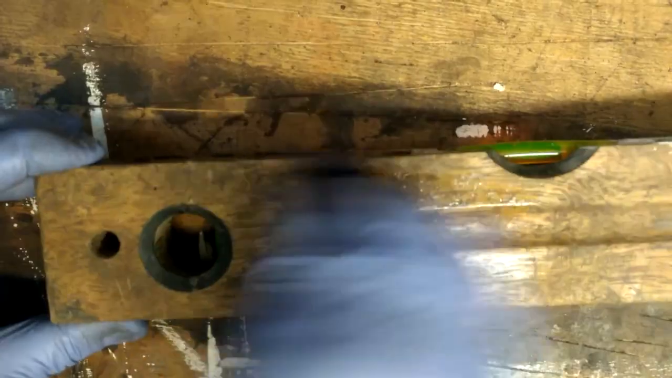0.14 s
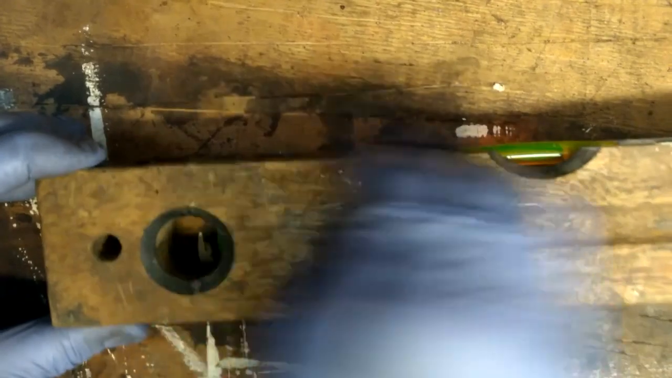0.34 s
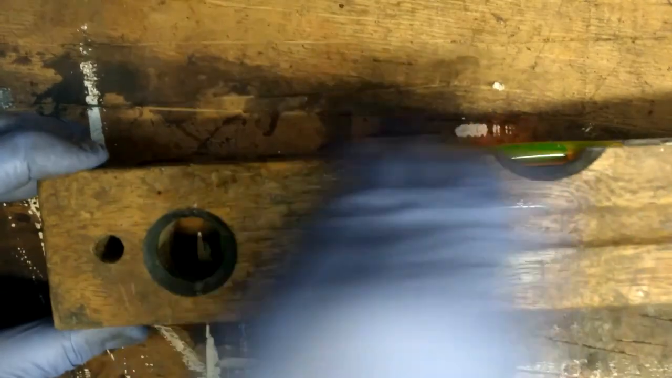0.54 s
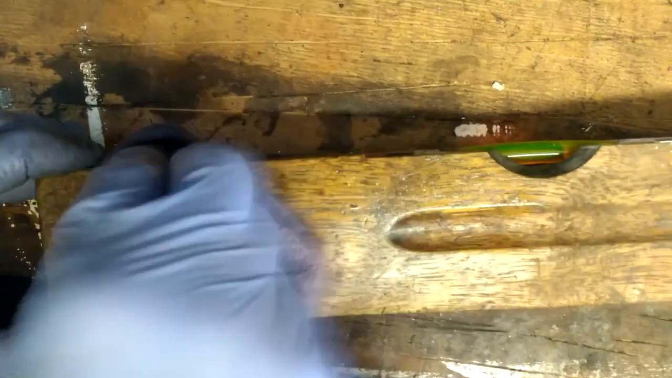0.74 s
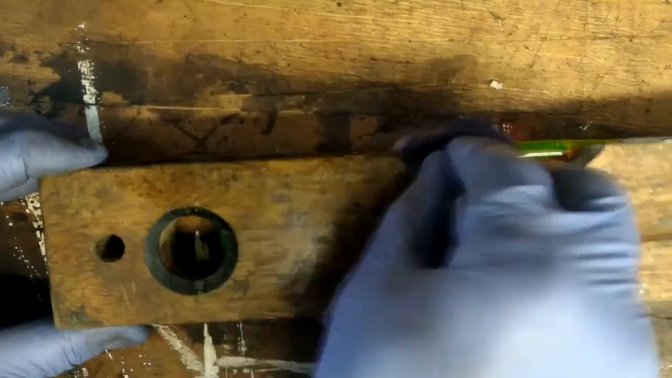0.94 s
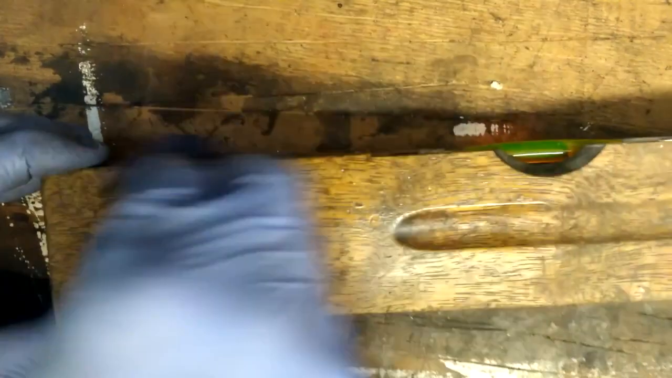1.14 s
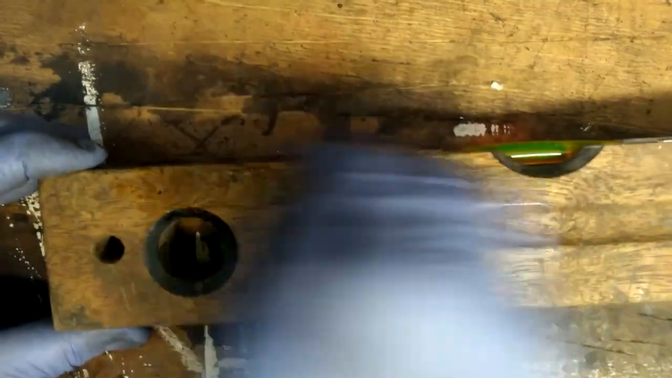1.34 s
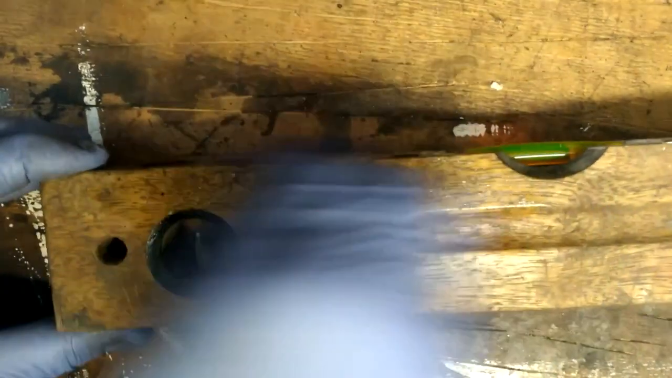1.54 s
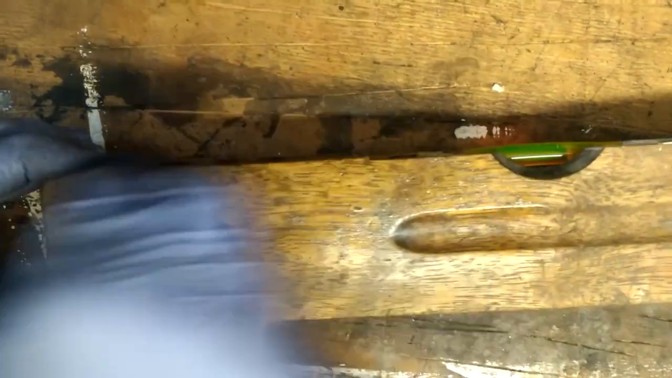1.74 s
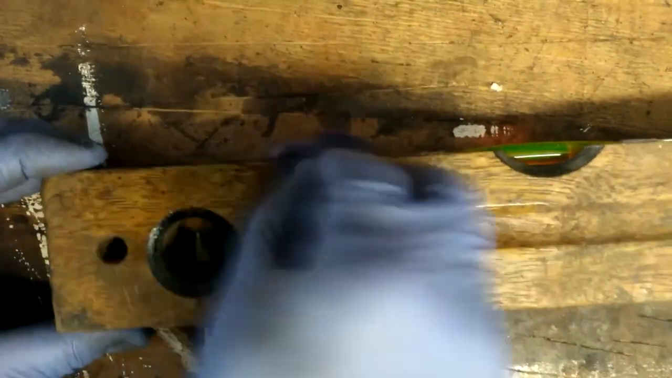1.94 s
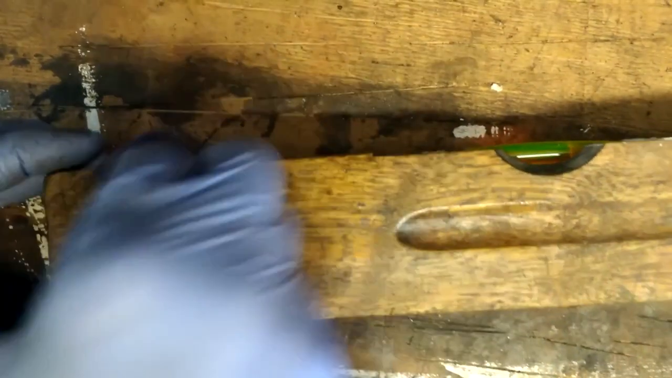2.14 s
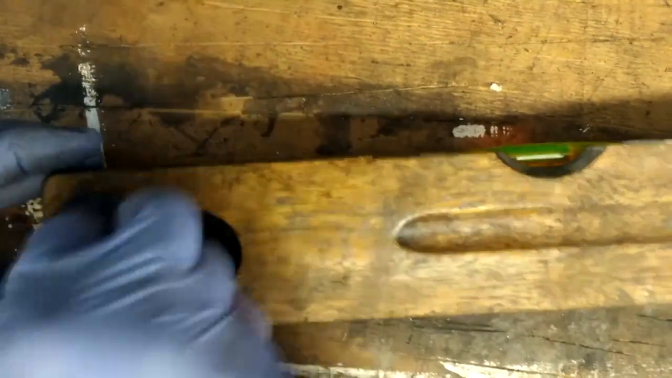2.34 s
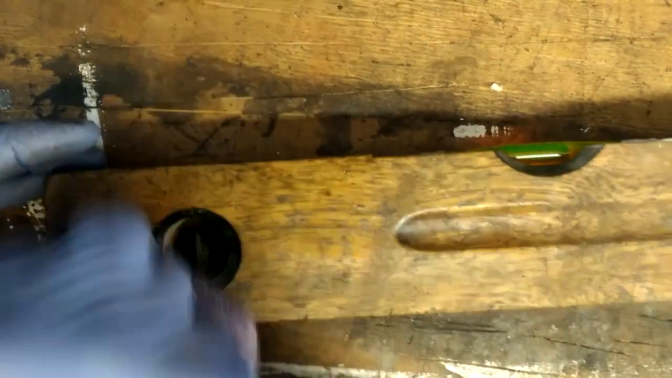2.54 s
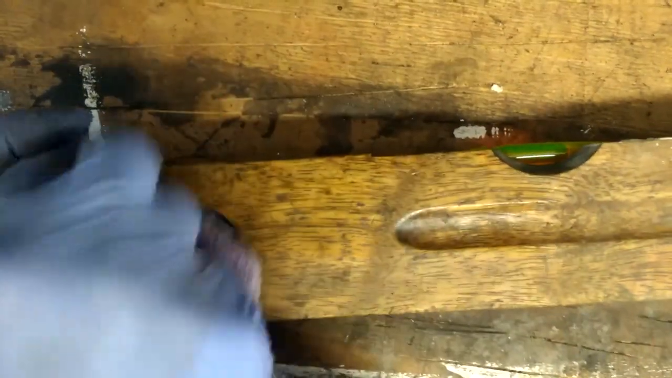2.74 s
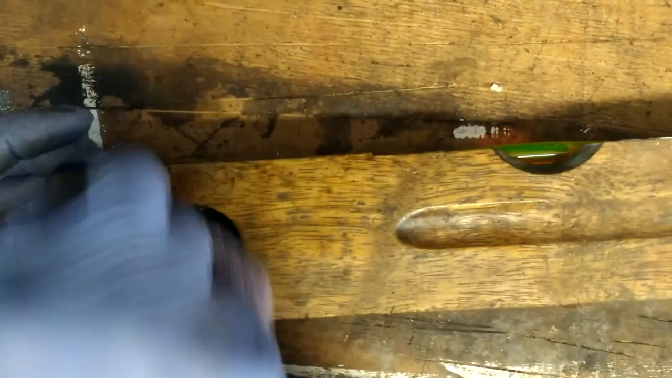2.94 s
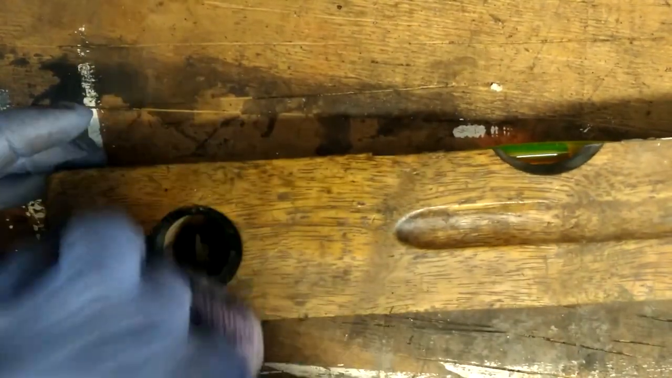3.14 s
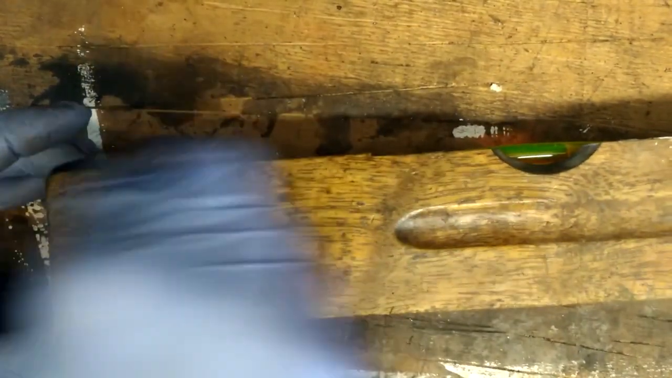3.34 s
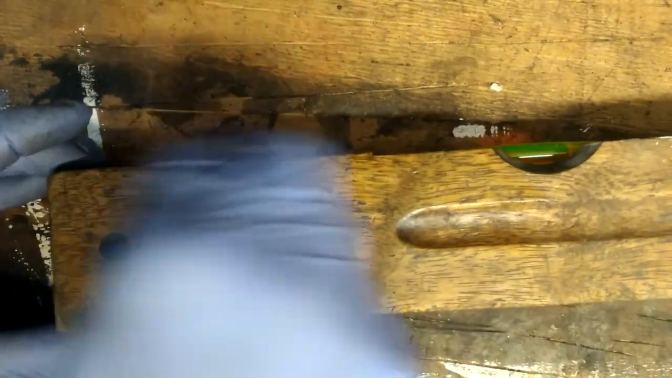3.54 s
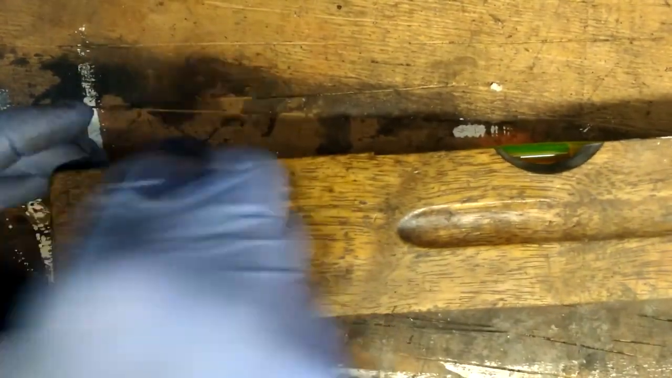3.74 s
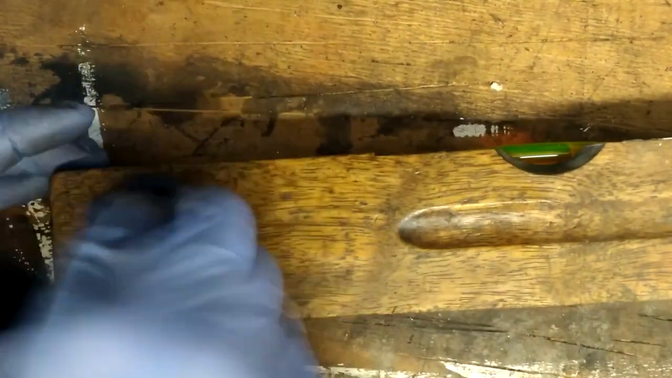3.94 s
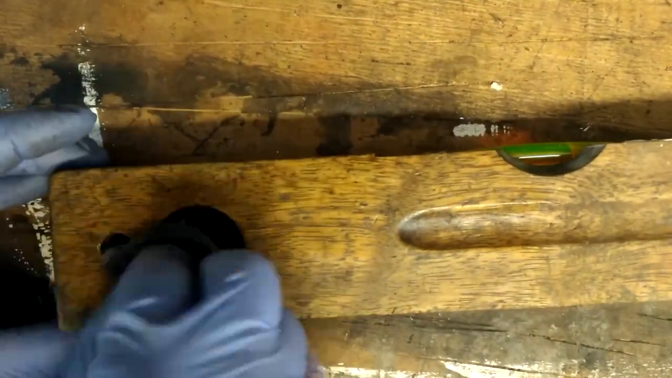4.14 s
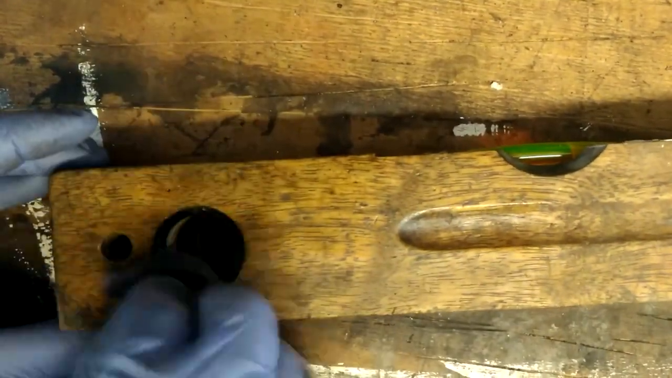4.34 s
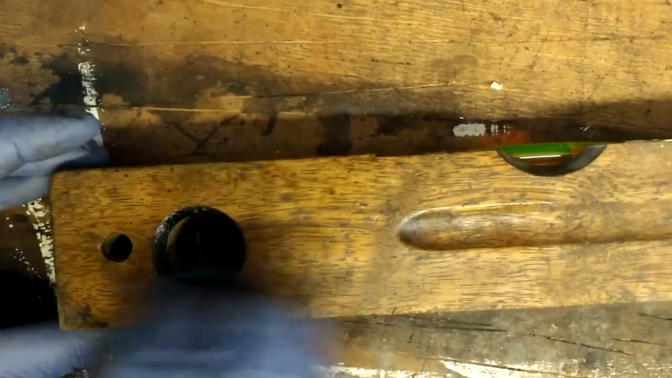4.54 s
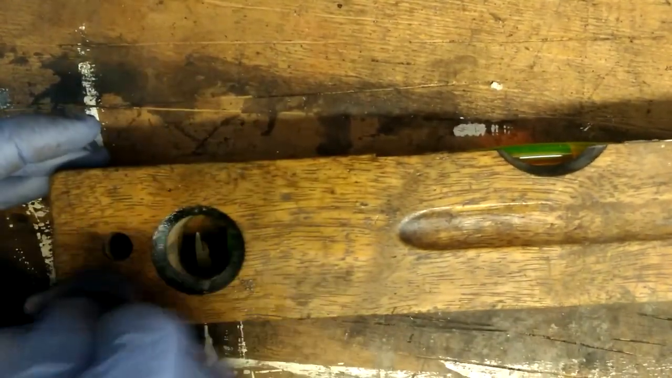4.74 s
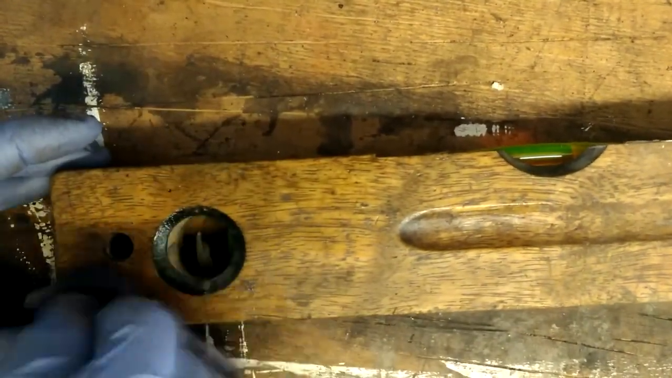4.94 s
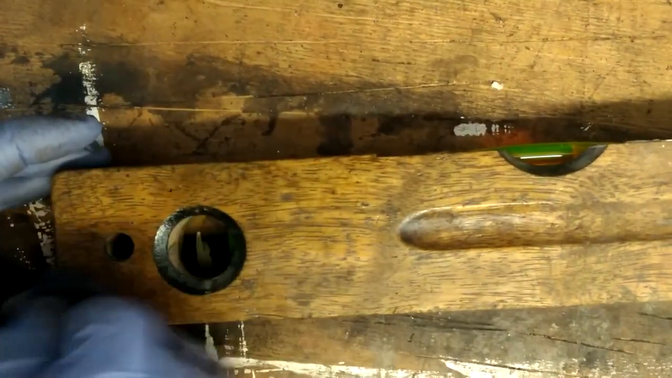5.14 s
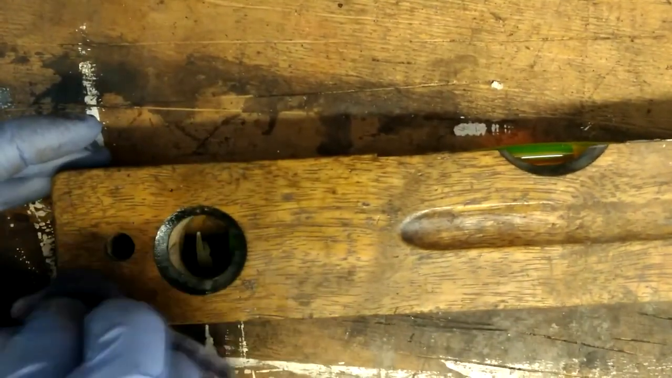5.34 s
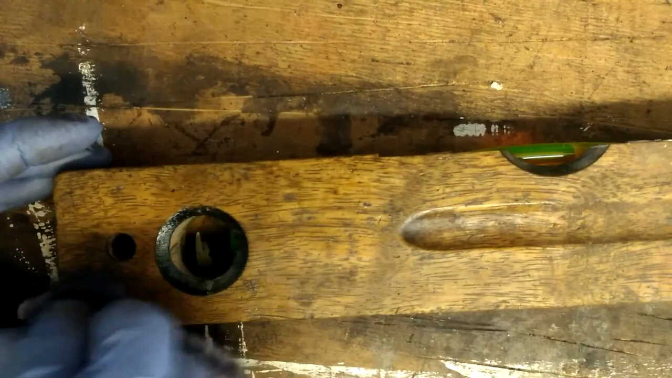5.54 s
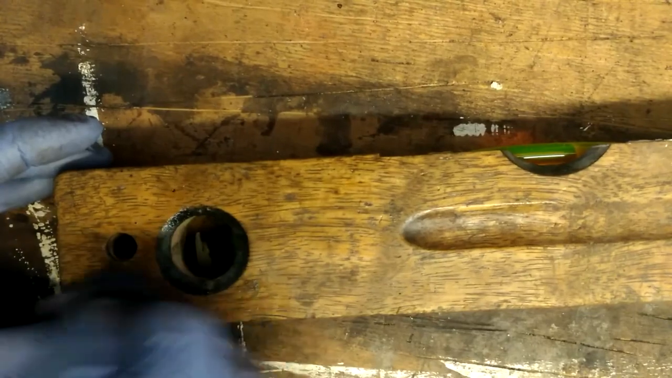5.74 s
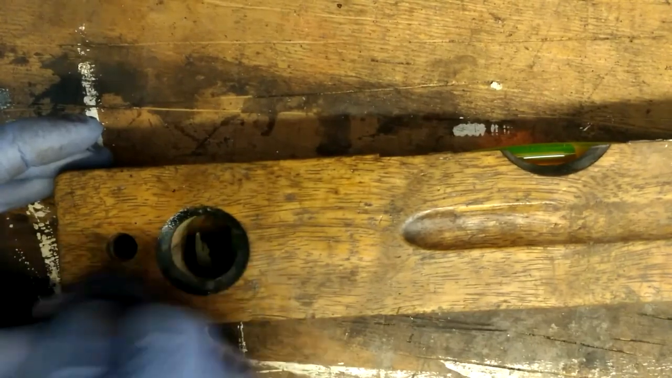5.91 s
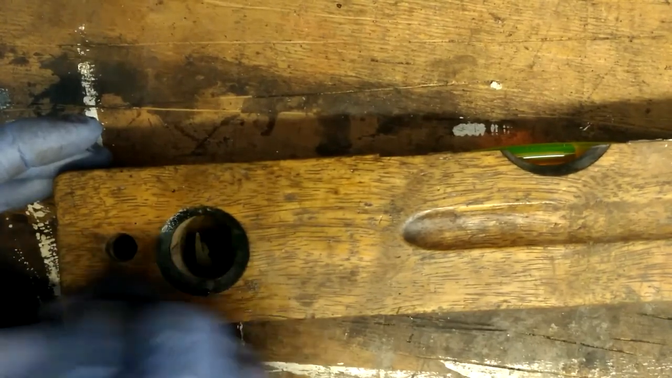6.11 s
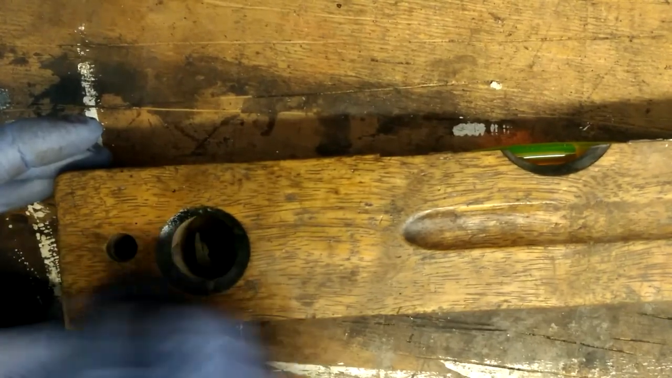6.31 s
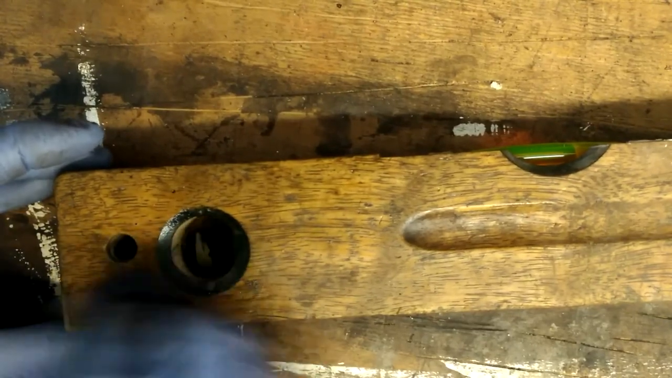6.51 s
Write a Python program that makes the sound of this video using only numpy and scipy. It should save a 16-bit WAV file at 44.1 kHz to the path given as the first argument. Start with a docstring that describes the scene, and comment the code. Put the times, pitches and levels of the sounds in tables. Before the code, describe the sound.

Fast, continuous wet-cloth rubbing over hollow-sounding wood, strokes quickening into short scrubs, light knocks and a small wet snap near the end

```python
"""Scrubbing an old spirit level

A gloved hand rubs a wooden level with a wet rag, in a small, quiet workshop, close to a microphone pair.
Every stroke is filtered noise shaped by the hand's speed: cloth hiss, and friction that rings the wood
and its metal ring. The level knocks softly on the bench at the turns, as bursts of decaying modes.
Short grips of the rag scrape and chafe, wet cloth snaps near the end; the microphones add a low noise.
"""
import sys
import numpy as np
from scipy import signal
from scipy.fft import rfft, irfft
from scipy.io import wavfile
from scipy.ndimage import uniform_filter1d

SR = 44100
rng = np.random.default_rng(int(sys.argv[2]) if len(sys.argv) > 2 else 0)


def wav_out(sig):
    """Save sig, one row per channel (or a flat mono array), as 16-bit PCM at SR to the path in sys.argv[1]."""
    wavfile.write(sys.argv[1], SR, np.round(np.clip(np.atleast_2d(sig).T, -1, 1) * 32767).astype(np.int16))


N = 294147
TIME, HZ = np.arange(N) / SR, np.fft.rfftfreq(N, 1 / SR)


def amp(db):
    """Decibels to gain."""
    return 10 ** (np.asarray(db) / 20)


def unit(x):
    """Scales to rms 1."""
    return x / np.sqrt(np.mean(abs(x) ** 2) + 1e-20)


def read(points, hz):
    """Reads a spectrum table on a log-frequency axis."""
    f, value = np.transpose(points)
    return np.interp(np.log(hz + 1), np.log(f + 1), value)


def add(mix, s, sound):
    """Mixes a sound in at time s."""
    part = mix[max(round(s * SR), 0):][:len(sound)]
    part += sound[:len(part)]


def wobble(rate_hz):
    """Slow random drift of rms 1, its spectrum fading out around the rate."""
    return unit(irfft(rfft(rng.standard_normal(N)) * np.exp(-(HZ / rate_hz) ** 2), N))


# spectrum of the microphones' own noise: (frequency [Hz], relative density [dB per Hz])
MIC_NOISE_SPECTRUM = [(20, 13), (52, 16.5), (78, 4.5), (200, -17), (400, -4.5), (1000, -15.5), (2000, -6),
                      (5000, -31), (15000, -37)]


def mic_noise():
    """Steady noise of the microphones themselves, mostly a deep rumble."""
    noise = rng.standard_normal((2, N))
    return amp(-55) * unit(irfft(rfft(noise) * amp(read(MIC_NOISE_SPECTRUM, HZ)), N))


def friction(response, catches_per_s, catch_share, flutter_db, flutter_hz):
    """Countless sliding fibres and a few that catch and let go, under unsteady pressure.

    Gives a direct and a scattered part; catch_share is the share of power in the catches.
    """
    slide = rng.standard_normal((2, N))
    catches = rng.standard_normal((2, N)) * (rng.random(N) < catches_per_s / SR)
    force = np.sqrt(1 - catch_share) * slide + np.sqrt(catch_share) * unit(catches)
    force *= amp(flutter_db * wobble(flutter_hz))
    return unit(irfft(rfft(force) * response, N))


# the strokes: (start [s], length [s], swell from start to end [dB],
# fizz [dB], swish [dB], wood [dB], high modes [dB]); each layer scales the swell and trims its level
STROKES = [(0.044, 0.11, -2, -42, -47.5, -48, -65), (0.149, 0.11, -4, -40.5, -48, -53, -63),
           (0.263, 0.11, 5, -41, -49.5, -61, -57), (0.377, 0.13, 11, -41, -47.5, -49, -67),
           (0.521, 0.16, 9, -44, -49.5, -50, -71), (0.686, 0.15, 9, -41.5, -48.5, -48, -57.5),
           (0.837, 0.17, 8, -45, -49.5, -46, -61), (1.018, 0.15, 10, -41.5, -48.5, -46, -68),
           (1.196, 0.16, 4, -43, -49.5, -49, -62), (1.358, 0.16, 11, -43.5, -50.5, -45.5, -62),
           (1.531, 0.15, 6, -44, -52, -45, -57.5), (1.69, 0.16, 20, -44, -52, -51, -68),
           (1.86, 0.14, 9, -45, -50.5, -44.5, -60), (2.003, 0.14, 15, -44, -51, -48, -58),
           (2.151, 0.092, 4, -43.5, -53.5, -57, -54.5), (2.264, 0.12, 0, -43.5, -52.5, -45.5, -60),
           (2.352, 0.1, 16, -51.5, -71, -54, -62), (2.435, 0.087, 2, -41.5, -53.5, -43.5, -55),
           (2.544, 0.12, -6, -44, -51.5, -45.5, -57.5), (2.66, 0.12, 12, -45, -53, -46, -54),
           (2.802, 0.12, 12, -44, -53.5, -47, -55.5), (2.949, 0.11, 1, -42.5, -51.5, -40, -55),
           (3.073, 0.1, 9, -42, -51.5, -44, -56.5), (3.204, 0.11, -4, -47, -54.5, -42, -55.5),
           (3.282, 0.11, 9, -42.5, -52, -43.5, -62), (3.404, 0.11, 1, -44.5, -57, -43, -56.5),
           (3.515, 0.1, 18, -43.5, -55.5, -48, -60), (3.623, 0.11, 18, -43.5, -52, -40.5, -57),
           (3.75, 0.09, 4, -44, -52, -43.5, -58), (3.851, 0.098, 7, -43.5, -57, -47, -58),
           (3.947, 0.086, 19, -43.5, -56, -47.5, -60), (4.023, 0.11, 4, -45.5, -55, -48, -61),
           (4.131, 0.089, 6, -45, -52.5, -54, -60), (4.229, 0.096, 13, -46, -53, -70, -58.5),
           (4.332, 0.092, 4, -45.5, -54, -66, -62.0), (4.439, 0.087, 22, -47.5, -57, -68, -62),
           (4.545, 0.12, 13, -45.5, -57, -56, -60.0), (4.663, 0.14, 30, -47.5, -55, -54, -67),
           (4.807, 0.11, 6, -47, -53.5, -46.5, -59), (4.922, 0.11, 13, -46.5, -53, -46, -59.5),
           (5.042, 0.091, 1, -45.5, -54.5, -51, -61), (5.14, 0.091, 13, -46, -51, -49.5, -53),
           (5.256, 0.084, 1, -46, -49, -44.5, -59), (5.348, 0.075, 10, -49.5, -56.5, -52, -54.5),
           (5.442, 0.078, 4, -44.5, -54, -61, -58.5), (5.529, 0.08, 3, -48, -55, -52, -60),
           (5.617, 0.08, 3, -46, -53.5, -52, -58), (5.702, 0.067, 18, -44, -53.5, -48, -60.0),
           (5.788, 0.076, 12, -45.5, -57, -50, -57.5), (5.876, 0.078, 12, -44.5, -54, -57, -61),
           (5.964, 0.083, 7, -46.5, -54.5, -51, -59.5), (6.052, 0.082, 25, -46.5, -57.5, -51, -57),
           (6.154, 0.08, 12, -48.5, -57, -49.5, -60), (6.247, 0.083, 1, -46.5, -51.5, -69, -55.5),
           (6.342, 0.11, -21, -48, -54, -45, -61), (6.435, 0.1, -20, -53, -57, -62, -76),
           (6.531, 0.19, 26, -50, -58.5, -57, -66)]
START, LENGTH, SWELL_DB, FIZZ_DB, SWISH_DB, WOOD_DB, RING_DB = np.transpose(STROKES)
ATTACK_S, RELEASE_S = 0.031, 0.059  # the hand gets up to speed quickly and brakes more slowly


def stroke_gain(levels_db, speed_power, swell_share):
    """Each stroke speeds up, holds and brakes as the hand bears down or eases; gain is a power of speed."""
    gain = np.zeros(N)
    for start, length, swell_db, db in zip(START, LENGTH, SWELL_DB, levels_db):
        t = np.arange(0, length, 1 / SR)
        ramps = np.clip([t / ATTACK_S, (length - t) / RELEASE_S], 0, 1)
        rise, fall = np.sin(np.pi / 2 * ramps)
        level_db = db + swell_share * swell_db * (t / length - .5)
        add(gain, start, amp(level_db) * (rise * fall) ** speed_power)
    return gain


# the held rag keeps rustling while the hand turns: (time [s], level before each layer's trim [dB])
RUSTLE = [(0, -65), (0.04, -64), (0.1, -56), (1.9, -52.5), (2.6, -55), (4.4, -56.5), (6.4, -56.5),
          (6.53, -73), (6.67, -58.5)]


def scrubbing():
    """Cloth hiss follows the speed closely; wood and bench stay loaded through the turns."""
    rustle = amp(np.interp(TIME, *np.transpose(RUSTLE)))
    wood_drive = stroke_gain(WOOD_DB, speed_power=0.91, swell_share=0.14)
    wood = rubbed_wood() * np.hypot(amp(-4.0) * wood_drive, amp(3.0) * rustle)
    return cloth(rustle) + rasp() + wood + bench_rumble(rustle, corner_hz=120)


def stroke_hiss(response, drive, rest):
    """Fibres sliding over the wood, loud in mid-stroke and sinking to a rustle at the turns."""
    hiss = friction(response, catches_per_s=4700, catch_share=0.086, flutter_db=1.0, flutter_hz=47.6)
    return hiss * np.hypot(drive, rest)


def patches(shape, bin_count, frame_count):
    """A smooth random field of rms 1 over frequency and time."""
    field = rng.standard_normal(shape)
    for _ in range(2):
        field = uniform_filter1d(field, size=bin_count, axis=0)
        field = uniform_filter1d(field, size=frame_count, axis=1)
    return unit(field)


def folds(x, patchy_db, streak_db):
    """The folds of the rag shift: broad patches of hiss swell and fade, narrow ones last about a stroke."""
    z = signal.stft(x, SR, nperseg=512)[2]
    broad = patches(z.shape[1:], bin_count=8, frame_count=6)
    narrow = patches(z.shape[1:], bin_count=2, frame_count=13)
    gain = unit(amp(patchy_db * broad + streak_db * narrow))
    return signal.istft(z * gain, SR, nperseg=512)[1][:, :N]


# spectrum of wet cloth on wood: (frequency [Hz], relative density [dB per Hz])
CLOTH_SPECTRUM = [(500, -20), (1100, -15), (1600, -7.5), (2400, -6), (3200, -7.5), (3600, -4), (5000, -5.5),
                  (6500, -3), (7800, -1), (9300, -2), (11300, 3), (12600, 1.5), (13500, 2), (14500, -0.5),
                  (15250, 2.5)]


def cloth(rustle):
    """Wet cloth hiss brightens with speed: a swish first, then fizz, and a sizzle at full tilt."""
    colour = amp(read(CLOTH_SPECTRUM, HZ))
    # power shares of the bands above 5.5 and 12 kHz
    treble = HZ ** 8 / (HZ ** 8 + 5500 ** 8)
    top = HZ ** 12 / (HZ ** 12 + 12000 ** 12)
    swish_drive = amp(1.03) * stroke_gain(SWISH_DB, speed_power=0.72, swell_share=0.76)
    fizz_drive = amp(-1.42) * stroke_gain(FIZZ_DB, speed_power=1.15, swell_share=0.69)
    sizzle_drive = amp(-1.5) * stroke_gain(FIZZ_DB, speed_power=1.6, swell_share=0.67)
    swish = stroke_hiss(colour * np.sqrt(1 - treble), swish_drive, amp(-2.5) * rustle)
    fizz = stroke_hiss(colour * np.sqrt(treble * (1 - top)), fizz_drive, amp(-9.5) * rustle)
    sizzle = stroke_hiss(colour * np.sqrt(top), sizzle_drive, amp(-17.0) * rustle)
    return folds(swish + fizz + sizzle, patchy_db=1.5, streak_db=2.0)


def resonances(modes):
    """Frequency response of a set of damped modes, each rolled off well above its own pitch."""
    total = 0
    for f, width, db in modes:
        peak = 1j * HZ * width / (f ** 2 - HZ ** 2 + 1j * HZ * width)
        total = total + amp(db) * peak / (1 + (HZ / (3 * f)) ** 2)
    return unit(total)


UPPER_MODES_HZ = 415  # modes above this gain by the lean, those below lose by it


def shifting(modes, force, shift_db, shift_hz, lean_db=0):
    """The rag travels over the nodes of the level, so each mode in turn stands out and sinks back."""
    spectrum, out = rfft(force), np.zeros_like(force)
    for hz, width, db in modes:
        level_db = db + shift_db * wobble(shift_hz) + lean_db * np.sign(hz - UPPER_MODES_HZ)
        ring = irfft(spectrum * resonances([(hz, width, 0)]), N)
        out += amp(level_db) * np.sqrt(width) * ring
    return unit(out)


# modes of the level lying on the bench: (frequency [Hz], width when rubbed [Hz], relative level [dB])
WOOD_MODES = [(283.3, 4.5, 0.5), (331, 10, -5.5), (351.9, 20, 3), (390, 39, -4), (440, 17, -3.5),
              (576, 24, -7.5), (648, 74, -13.5), (804, 32, -8), (892, 30.6, -8.5)]
# long strokes over the middle favour the upper modes, short ones at the end the lower:
# (time [s], lean [dB])
MODE_LEAN = [(0, 0), (0.7, 1), (2.1, 1.5), (2.5, -0.5), (6.67, 0)]
# spectrum of the dull grain noise: (frequency [Hz], relative density [dB per Hz])
GRAIN_SPECTRUM = [(60, -45), (230, -62), (340, 5), (520, -10.5), (850, -2), (1050, -34), (1600, -24),
                  (3000, -26), (8000, -61)]


def rubbed_wood():
    """The dragging rag sounds the body modes of the level over the dull noise of its grain."""
    force = friction(1, catches_per_s=300, catch_share=0.2, flutter_db=1.0, flutter_hz=47.3)
    grain = friction(amp(read(GRAIN_SPECTRUM, HZ)), catches_per_s=500, catch_share=0.12,
                     flutter_db=3.0, flutter_hz=49.0)
    lean_db = np.interp(TIME, *np.transpose(MODE_LEAN))
    body = shifting(WOOD_MODES, force, shift_db=2.0, shift_hz=7.3, lean_db=lean_db)
    return unit(body + amp(-5.5) * grain)


# higher modes, strongest near the metal ring and the edge, in a lower and an upper group:
# (frequency [Hz], width [Hz], relative level [dB])
RING_LOW_MODES = [(1231, 49, 1), (1390, 61, -11)]
RING_HIGH_MODES = [(1873, 41, 6), (1977, 56, 6), (2210, 88, -30)]
# how strongly the rag's place on the level excites the lower group: (time [s], level [dB])
RAG_PLACE = [(0, -24.5), (2.2, -16.5), (2.7, -11.5), (3.3, -17), (3.9, -13.5), (4.35, -21.5), (4.8, -19),
             (5.3, -15.5), (6.5, -18)]


def rasp():
    """Friction rings the higher modes, the lower group more or less according to where the rag is."""
    force = friction(1, catches_per_s=1300, catch_share=0.53, flutter_db=1.5, flutter_hz=49.6)
    low = shifting(RING_LOW_MODES, force, shift_db=3.0, shift_hz=8.4)
    high = shifting(RING_HIGH_MODES, force, shift_db=2.5, shift_hz=7.2)
    place = amp(np.interp(TIME, *np.transpose(RAG_PLACE)))
    low *= place * stroke_gain(FIZZ_DB, speed_power=0.57, swell_share=0.39)
    high *= amp(2.5) * stroke_gain(RING_DB, speed_power=0.41, swell_share=0.29)
    return low + high


# modes of the bench top: (frequency [Hz], width when rubbed [Hz], relative level [dB])
BENCH_MODES = [(85, 33, -1.5), (99.4, 9.3, 6), (134, 56, 0), (151, 42, -7.5), (191, 19, -2)]
# how hard the hand's weight couples into the bench: (time [s], level before a fixed trim [dB])
HAND_LOAD = [(0, -4), (.3, 1), (.5, -10), (1, -14), (2.2, -17), (2.5, -2.5), (3.05, 0.5), (3.6, -2.5),
             (3.85, -10), (4.2, -1), (4.45, -10.5), (5.001, -15), (6.4, -11), (6.55, -7)]


def bench_rumble(rustle, corner_hz):
    """The bench top murmurs under the hand; a heavy stroke brings out its upper modes."""
    response = resonances(BENCH_MODES) / (1 + (60 / (HZ + 1)) ** 4)
    upper = response / (1 + (corner_hz / (HZ + 1)) ** 4)
    murmur = friction(response, catches_per_s=120, catch_share=0.07, flutter_db=2.0, flutter_hz=12)
    grind = friction(upper, catches_per_s=140, catch_share=0.17, flutter_db=3.5, flutter_hz=12.4)
    load = amp(np.interp(TIME, *np.transpose(HAND_LOAD)))
    drive = load * stroke_gain(FIZZ_DB, speed_power=0.15, swell_share=0.3)
    return amp(-2.5) * rustle * murmur + amp(-8.0) * drive * grind


def blow(modes, contact_s, scatter_db, damping):
    """A soft blow rings the modes, narrow ones gently and long; where it lands changes their mix."""
    t = np.arange(SR // 3) / SR
    f, width, db = np.transpose(modes)[:, :, None]
    size = width * amp(db + scatter_db * rng.standard_normal(f.shape))
    decay = np.exp(-np.pi * width * damping * t)
    ring = (size * decay * np.sin(2 * np.pi * f * t)).sum(0)
    ring *= 1 - np.exp(-t / contact_s)
    return ring / abs(ring).max()


# the loudest bumps of the level on the bench:
# (time [s], wood knock peak [dB], bench thud before its trims [dB])
KNOCKS = [(0.048, -43, -57), (0.055, -40, -43), (0.083, -36.5, -39), (0.102, -42, -38), (0.143, -38, -53),
          (0.177, -50, -32), (0.209, -45, -29), (0.239, -57, -27), (0.257, -52, -29), (0.279, -32, -27),
          (0.29, -43, -34), (0.669, -37, -56), (0.822, -33.5, -42), (1.066, -31, -50), (1.566, -34, -52),
          (1.723, -44, -54), (2.02, -31.5, -59), (2.15, -33.5, -42), (2.465, -37, -54), (2.491, -33.5, -39),
          (2.749, -30.5, -54), (2.768, -33.5, -57), (2.971, -38, -34), (3.024, -36.5, -30),
          (3.229, -35, -54), (3.39, -40, -29), (3.443, -37, -50), (3.541, -34, -62), (3.669, -34, -56),
          (4.0845, -33.5, -19.5), (4.103, -51, -23), (4.14, -36, -31), (4.237, -41.5, -37),
          (4.659, -42, -30), (4.704, -36.5, -53), (4.951, -39, -57), (5.05, -35.5, -63), (5.286, -33, -56),
          (5.8, -36, -59), (5.99, -38, -58), (6.159, -37, -59), (6.377, -42, -61), (6.447, -37.5, -33)]


def knocks(bumps):
    """The level tips and settles on the bench as the push changes direction, and its wood rings."""
    out = np.zeros(N)
    for s, wood_db, _ in bumps:
        add(out, s, amp(wood_db) * blow(WOOD_MODES, contact_s=0.00094, scatter_db=3.0, damping=1.45))
    return out


# the level rocks a little around the start of a stroke
ROCK_DELAY_S, ROCK_JITTER_S = 0.00382, .01
ROCK_WOOD_DB, ROCK_THUD_DB, ROCK_SCATTER_DB = -3, -22, 5  # the first two relative to the stroke's fizz


def rocking():
    """A small knock of chance strength at each turn without a loud bump, as rows like those of KNOCKS."""
    when, size = rng.standard_normal((len(STROKES), 2)).T
    time_s = START + ROCK_DELAY_S + ROCK_JITTER_S * when
    db = FIZZ_DB + ROCK_SCATTER_DB * size
    rows = np.transpose([time_s, db + ROCK_WOOD_DB, db + ROCK_THUD_DB])
    to_bump_s = abs(START[:, None] - np.transpose(KNOCKS)[0]).min(1)
    return list(rows[to_bump_s > .02])


THUD_LEAD_S = 0.00302  # the bench is shoved just before the wood rings


def thuds(bumps, push_s):
    """Each knock shoves the bench: a dull push, alike at both microphones, and a short boom of its modes."""
    pushes, booms = np.zeros((2, N))
    u = np.arange(SR // 20) / SR / push_s
    push = u * (2 - u) * np.exp(-u)
    for s, _, thud_db in bumps:
        add(pushes, s - THUD_LEAD_S, -amp(thud_db - 13.5) * push / push.max())
        boom = blow(BENCH_MODES, contact_s=0.0018, scatter_db=4.0, damping=3.5)
        add(booms, s, amp(thud_db - 15.0) * boom)
    # the bench radiates little below its lowest mode
    highpass = signal.butter(3, 85, "highpass", fs=SR, output="sos")
    return signal.sosfilt(highpass, pushes), booms


def resonate(x, hz, width):
    """One resonance, applied twice for steep sides."""
    section = np.concatenate(signal.iirpeak(hz, hz / width, SR))
    return signal.sosfilt([section, section], x)


def grips(rows, modes):
    """The rag holds, then judders free: a bell-shaped surge of friction rings a few resonances."""
    out, t = np.zeros(N), np.arange(SR // 4) / SR
    for middle, half, pitch_hz, db in rows:
        lead = min(3 * half, t[-1] / 2)
        bell = np.exp(-.5 * ((t - lead) / half) ** 2)
        force = bell * rng.standard_normal(len(t))
        ring = 0
        for multiple, width, mode_db in modes:
            ring = ring + amp(mode_db) * unit(resonate(force, multiple * pitch_hz, width))
        # set in 2 ms early
        add(out, middle - lead - .002, amp(db) * unit(ring) * np.sqrt(np.mean(bell ** 2)))
    return out


# heavy drags over the wood: (middle [s], half length [s], pitch [Hz], level [dB])
SCUFFS = [(0.05, 0.0028, 630, -48), (0.06, 0.0038, 490, -38.5), (0.071, 0.007, 720, -51.5),
          (0.084, 0.0024, 830, -45.5), (0.168, 0.0078, 840, -50), (0.2, 0.012, 810, -51),
          (0.78, 0.043, 770, -51), (0.976, 0.0035, 785, -44), (1.1, 0.02, 790, -56),
          (1.792, 0.0058, 750, -48.5), (1.884, 0.008, 826, -49), (2.185, 0.006, 800, -50),
          (2.726, 0.008, 715, -50), (2.987, 0.01, 804, -56), (3.446, 0.0043, 845, -62),
          (3.697, 0.0097, 720, -51), (4.448, 0.0048, 870, -51), (4.821, 0.0085, 790, -56)]
# their resonance: (multiple of the pitch, width of one filter pass [Hz], relative level [dB])
SCUFF_MODES = [(1, 290, 0)]


def scuffs():
    """The rag drags heavily over the wood; the surge of friction gives a hollow scrape."""
    return grips(SCUFFS, SCUFF_MODES)


SNAG_LOW_HZ, SNAG_HIGH_HZ, SNAG_HALF_S = 2140, 4680, 0.0032
SNAG_DB, SNAG_SCATTER_DB = -9, -1.5  # relative to the stroke's swish; the scatter is scaled by chance
# resonance of a snag: (multiple of the pitch, width of one filter pass [Hz], relative level [dB])
SNAG_MODES = [(1, 360, 0)]


def snags(count):
    """Single threads catch at chance places in every stroke and scrape briefly, each at its own pitch."""
    rows = []
    for start, length, swish_db in zip(START, LENGTH, SWISH_DB):
        places, pitches = rng.beta(2, 2, count), rng.random(count)
        sizes = rng.uniform(-1, 2.8, count)
        for place, pitch, size in zip(places, pitches, sizes):
            pitch_hz = SNAG_LOW_HZ * (SNAG_HIGH_HZ / SNAG_LOW_HZ) ** pitch
            db = swish_db + SNAG_DB + SNAG_SCATTER_DB * size
            rows.append((start + place * length, SNAG_HALF_S, pitch_hz, db))
    return grips(rows, SNAG_MODES)


# brief grips of the rag: (middle [s], half length [s], pitch [Hz], level [dB])
CHAFES = [(1.271, 0.0088, 2235, -49), (4.085, 0.0064, 2034, -49), (4.112, 0.01, 1960, -46),
          (4.775, 0.0085, 2010, -44.5), (5.002, 0.015, 2045, -53), (5.207, 0.013, 2040, -47),
          (5.573, 0.015, 2000, -49)]
# their resonances: (multiple of the pitch, width of one filter pass [Hz], relative level [dB])
CHAFE_MODES = [(1, 80, 1.5), (1.16, 130, -17), (1.39, 260, -12)]


def chafes():
    """The rag grips for a moment and chafes on the high modes."""
    return grips(CHAFES, CHAFE_MODES)


# the rag lets go with a wet snap: (time [s], level before colouring and trim [dB])
SNAPS = [(6.458, -43), (6.4616, -33)]


def snaps(decay_s):
    """Wet cloth peels off the wood with a short, bright tick of decaying noise."""
    out, t = np.zeros(N), np.arange(600) / SR
    for s, db in SNAPS:
        add(out, s, amp(db) * np.exp(-t / decay_s) * rng.standard_normal(len(t)))
    colour = amp(read(CLOTH_SPECTRUM, HZ) + 8.0) / (1 + (4000 / (HZ + 1)) ** 4)
    return irfft(rfft(out) * colour, N)


# reverberation of the workshop: (frequency [Hz], time to fall 60 dB [s])
ROOM_DECAY = [(100, 0.1), (500, 0.48), (3000, 0.29), (15000, 0.14)]


def room(x):
    """Sparse reflections that die band by band, different on each side."""
    count = SR // 3
    taps = rng.standard_normal((2, count)) * (rng.random((2, count)) < .1)
    taps *= np.arange(count) > SR // 250  # nothing comes back in the first 4 ms
    hz, t, z = signal.stft(taps, SR, nperseg=256)
    decay = amp(-60 * t / read(ROOM_DECAY, hz)[:, None])
    tail = signal.istft(z * decay, SR, nperseg=256)[1]
    return signal.fftconvolve(x[None], tail / np.linalg.norm(tail[0]), axes=1)[:, :N]


# the microphone pair, phase before it is drawn towards in step or opposed:
# (frequency [Hz], lead of left over right [rad])
MIC_PHASE = [(75, -3.1), (100, -1.6), (160, -2.1), (260, -1.7), (450, -1.45), (550, -1), (1450, -.55),
             (1600, -3.8), (2000, -4.35), (2250, -4.7), (2750, -6.28), (3050, -7.3), (3200, -8.6),
             (3500, -9.42), (3750, -10.1), (4450, -12.57), (5400, -15.7), (6250, -18.85), (7050, -22),
             (7500, -23.5), (8300, -26.75), (8900, -26.8), (9400, -25), (10000, -23.8), (10700, -22),
             (13350, -15.7), (16000, -9.6)]
# (frequency [Hz], left minus right [dB])
MIC_BALANCE = [(70, 0.5), (100, -7), (150, 0), (200, 3.5), (270, 0.5), (360, 6), (750, 2), (1100, 0.5),
               (1400, -2.5), (1950, 2.5), (2600, -0.5), (15000, 0.5)]
# (frequency [Hz], likeness of the two sides before blurring [0 to 1])
MIC_LIKENESS = [(60, 1), (100, 0.65), (150, 0.35), (350, 0.62), (700, 0.72), (900, 0.95), (1300, 0.94),
                (1500, 0.15), (1750, 0.7), (1980, 0.95), (2600, 0.42), (3100, 0.5), (3450, 0.96), (4400, 1),
                (6300, 1), (6900, 0.55), (8100, 0.5), (8600, 0.8), (9100, 0.5), (9500, 0.85), (10500, 1),
                (12000, 1), (13300, 0.93), (14700, 1)]
MIC_BLUR = 0.7  # loss of likeness midway between in step and opposed


def microphones(pair):
    """Sound reaches the two ports at different times; they are most alike when in step or opposed."""
    direct, scattered = rfft(pair)
    phase = np.interp(HZ, *np.transpose(MIC_PHASE))
    # above 1.5 kHz the phase is drawn towards in step or opposed
    phase = phase - .5 * np.sin(2 * phase) * (HZ > 1500)
    blur = MIC_BLUR * np.sin(phase) ** 2 * (HZ > 2500)
    like = np.clip(read(MIC_LIKENESS, HZ) * (1 - blur), 0, 1)
    right = (like * direct + np.sqrt(1 - like ** 2) * scattered) * np.exp(-1j * phase)
    balance = amp(read(MIC_BALANCE, HZ) / 2)
    return irfft(np.array([direct * balance, right / balance]), N)


def scene():
    """Rubbing, knocks and snaps at arm's length, with faint reflections and the microphones' noise."""
    near = scrubbing() + scuffs() + snags(count=3) + chafes()
    bumps = list(KNOCKS) + rocking()
    pushes, booms = thuds(bumps, push_s=0.00099)
    hits = knocks(bumps) + booms + amp(-0.5) * snaps(decay_s=0.0012)
    # the second row is the scattered part
    near += np.array([hits, amp(-5.0) * room(hits)[0]])
    return microphones(near + mic_noise()) + pushes + amp(-46.0) * room(near[0])


def record(dry):
    """The recorder's band limit: a steep low-pass at 15.6 kHz."""
    lowpass = signal.firwin(601, 15600, window=("kaiser", 8), fs=SR)
    return signal.oaconvolve(dry, lowpass[None], "same", axes=1)


dry = scene()
out = record(dry)
wav_out(out)
```